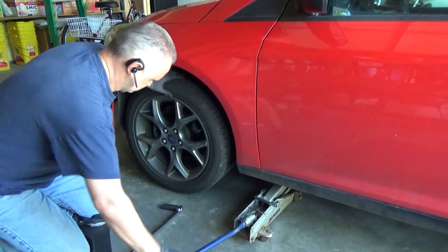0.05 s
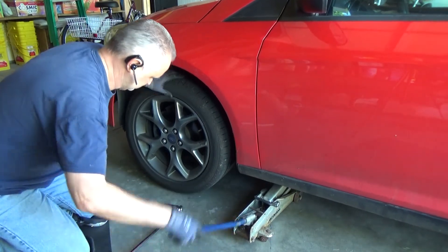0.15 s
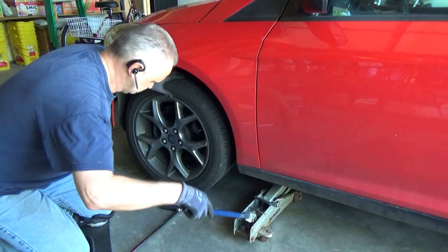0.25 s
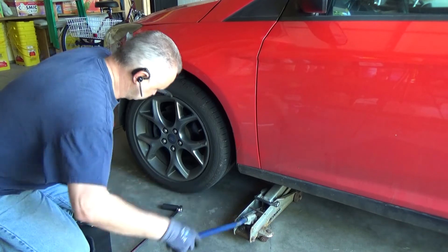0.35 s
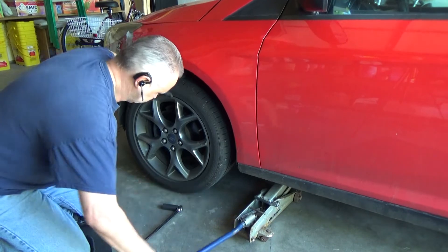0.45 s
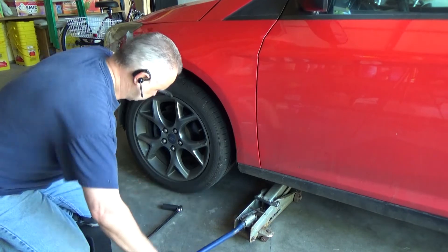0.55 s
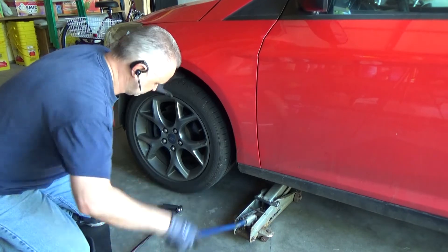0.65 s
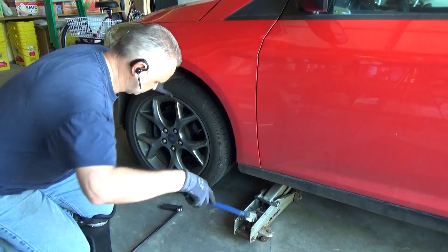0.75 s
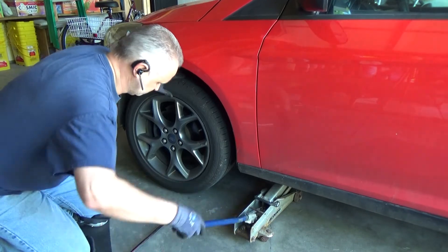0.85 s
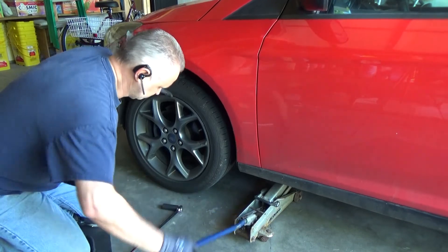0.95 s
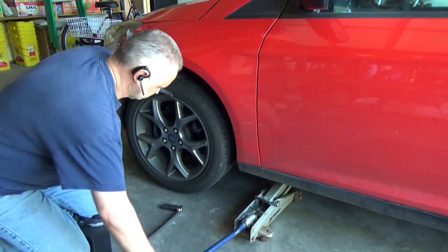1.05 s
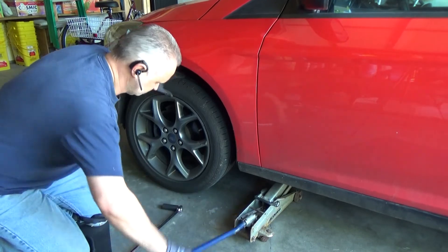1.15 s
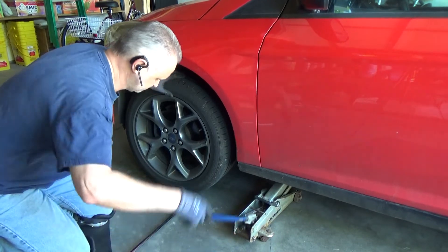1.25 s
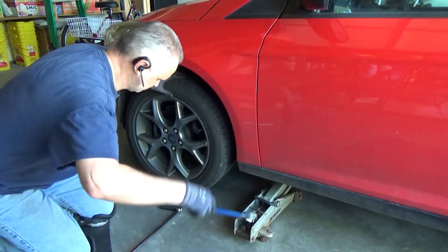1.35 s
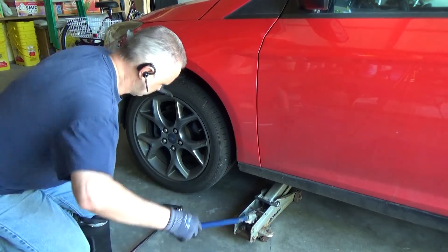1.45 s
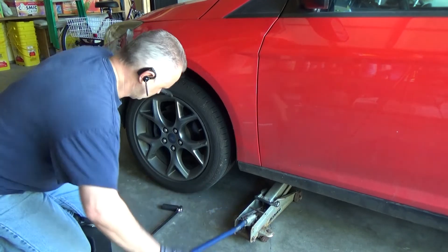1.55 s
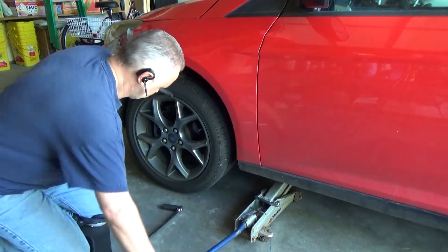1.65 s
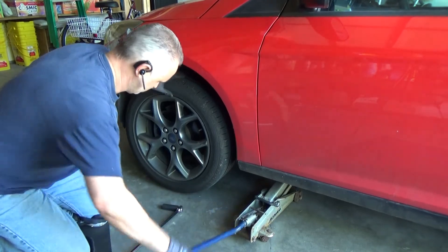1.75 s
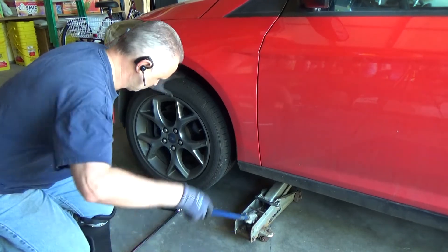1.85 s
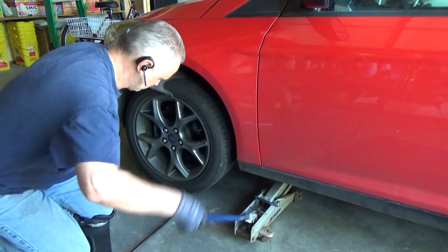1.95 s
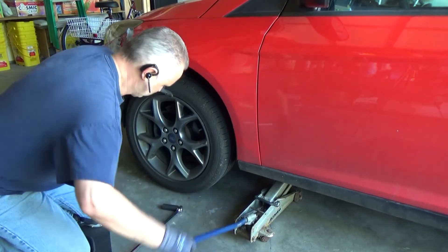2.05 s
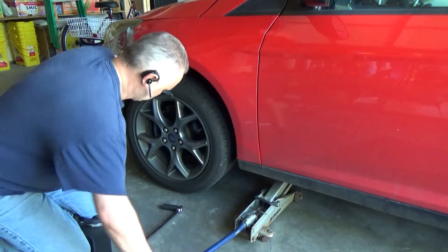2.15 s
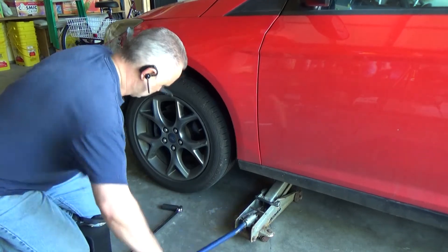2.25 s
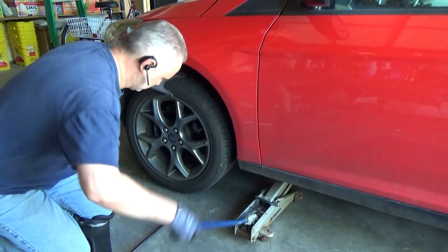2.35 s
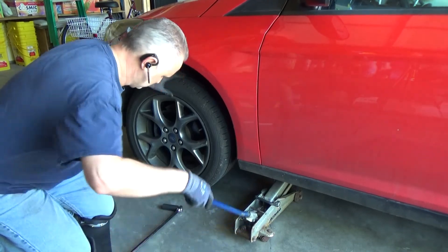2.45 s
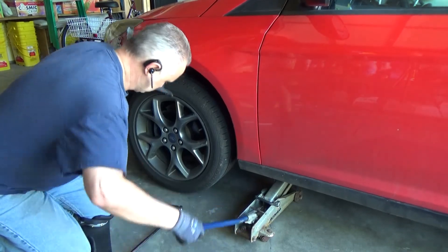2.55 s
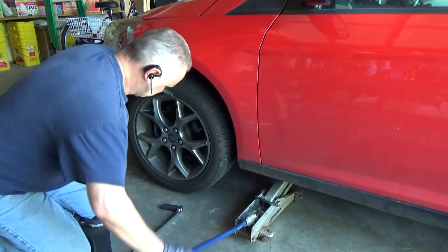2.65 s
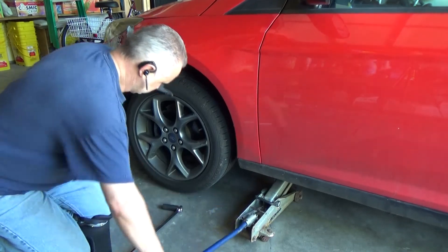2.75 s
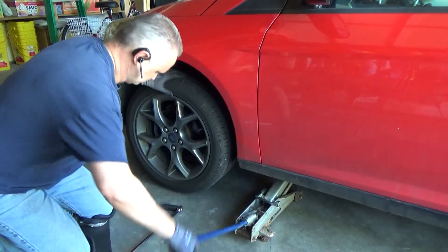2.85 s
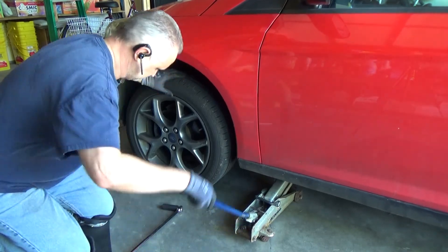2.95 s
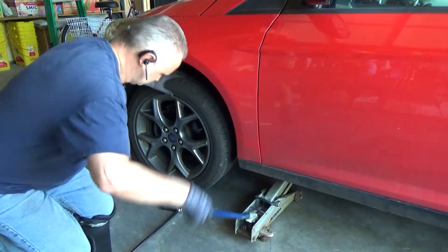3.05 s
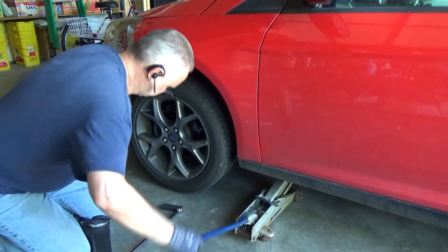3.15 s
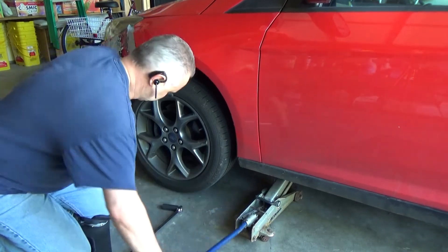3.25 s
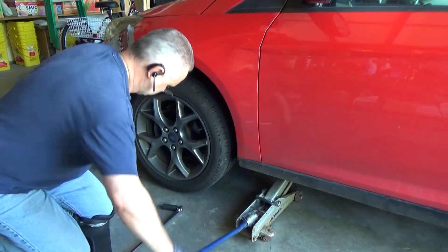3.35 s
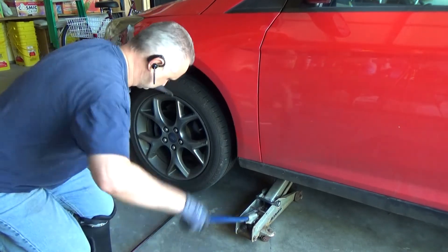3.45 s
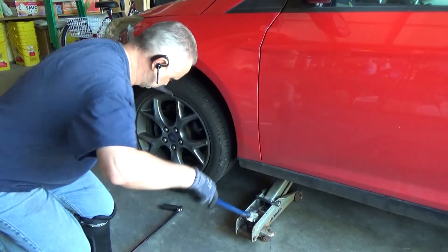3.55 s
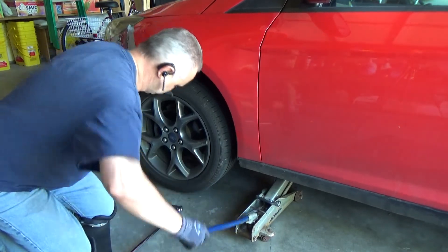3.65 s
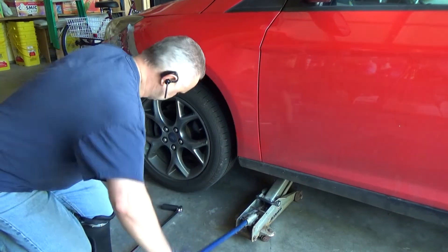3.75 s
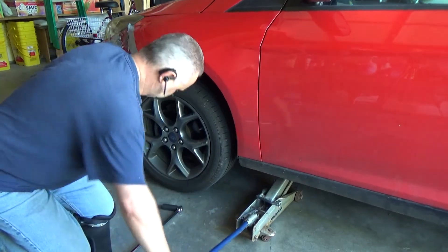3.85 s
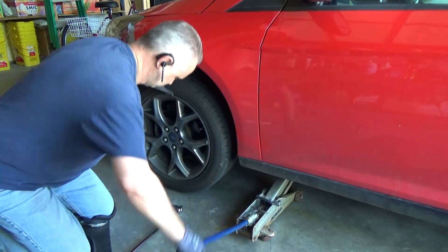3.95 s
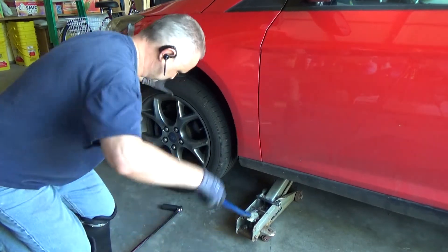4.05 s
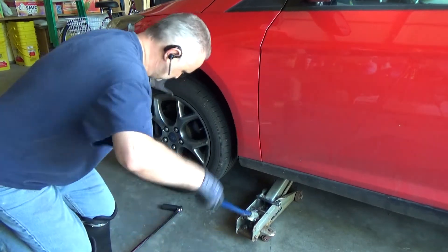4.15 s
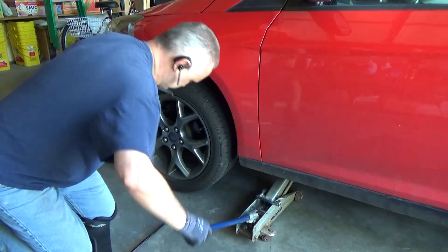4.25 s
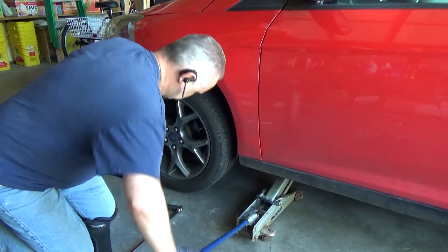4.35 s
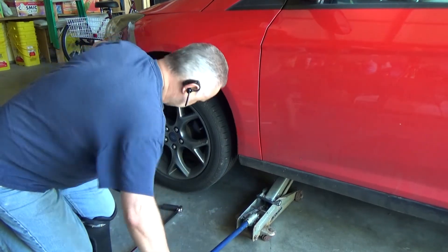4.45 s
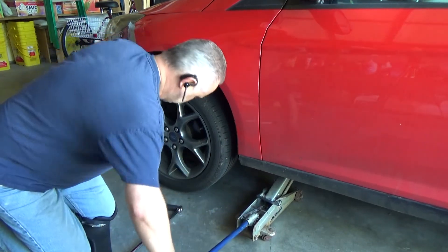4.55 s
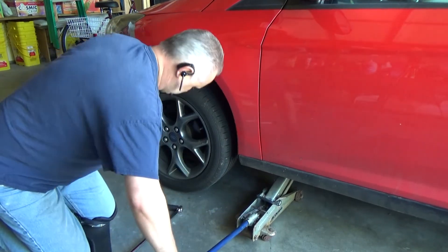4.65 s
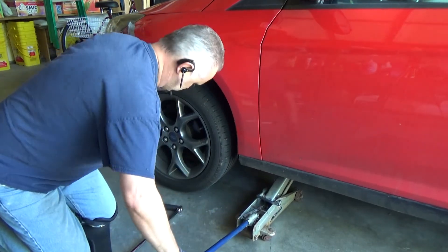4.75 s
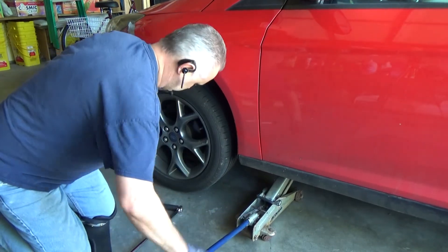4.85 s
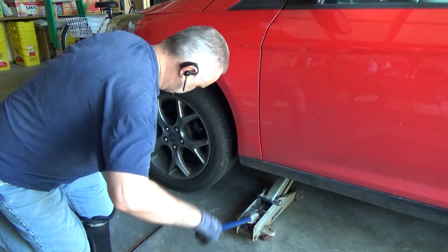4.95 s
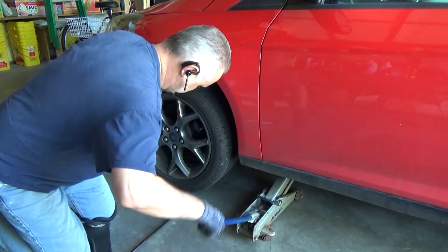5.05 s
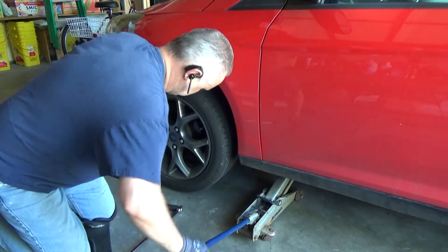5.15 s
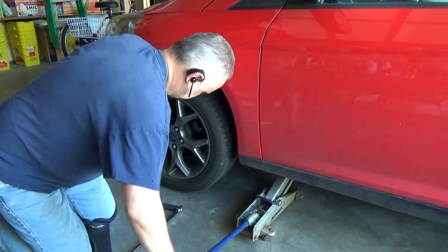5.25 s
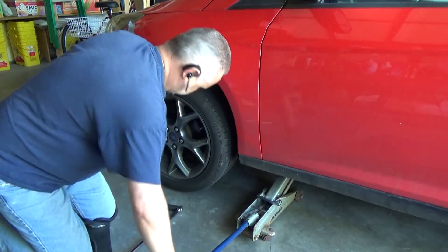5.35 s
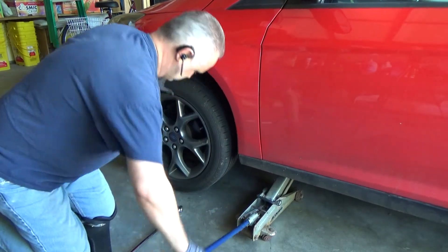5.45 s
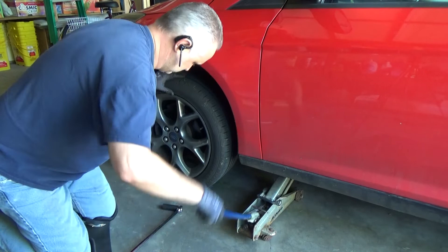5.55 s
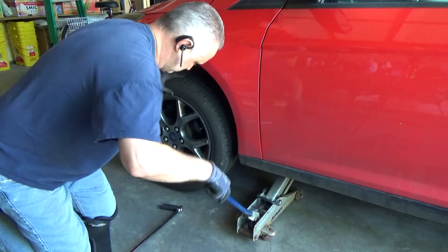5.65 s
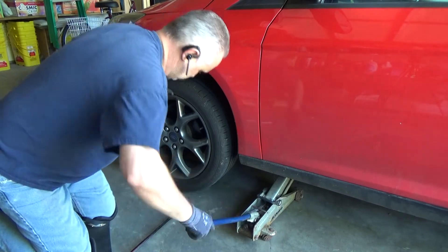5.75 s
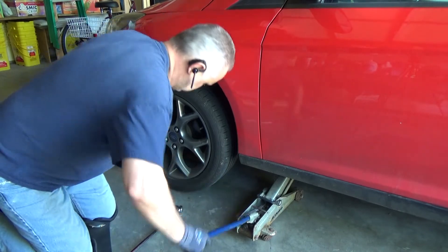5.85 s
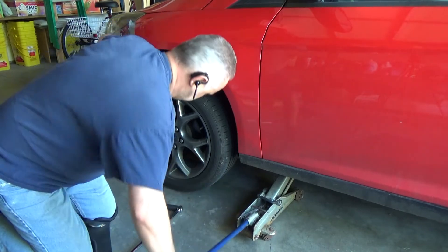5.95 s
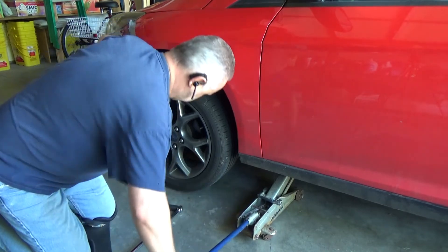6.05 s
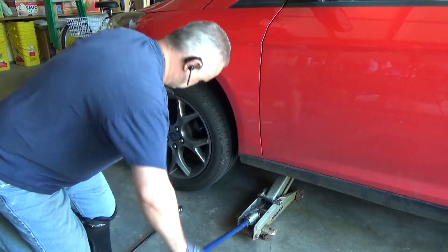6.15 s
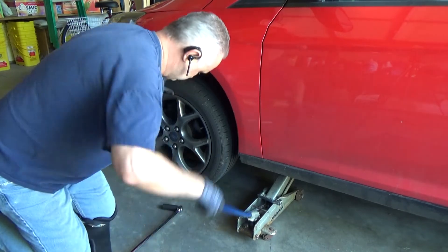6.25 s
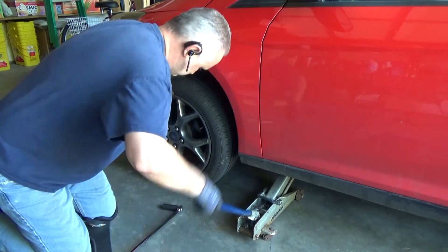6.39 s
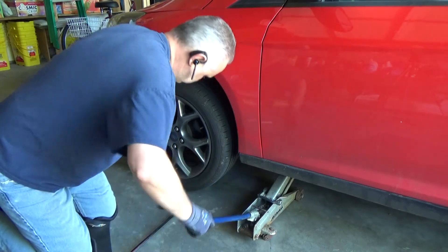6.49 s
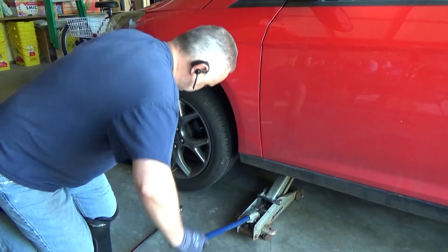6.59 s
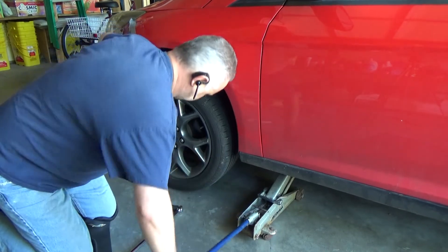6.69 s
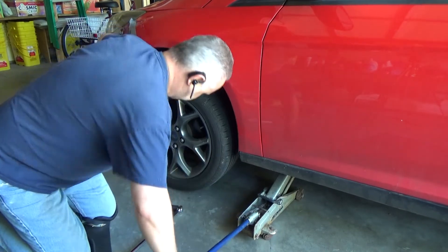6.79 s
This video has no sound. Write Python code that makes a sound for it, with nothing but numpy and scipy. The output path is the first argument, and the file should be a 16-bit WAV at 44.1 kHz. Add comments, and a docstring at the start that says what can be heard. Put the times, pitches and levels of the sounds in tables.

```python
"""A hydraulic floor jack is pumped by hand in a softly humming, hissing garage.
From the start its loose pins grind and rattle, and the unloaded lifting arm groans once. Then, about
twice a second, the steel handle clanks at the bottom of a stroke and the frame thuds as the stroke
turns. From about 4.5 s the car's weight is on the jack: the pumping slows and oil whistles through
the valve. A short echo follows every sound."""
import sys
import numpy as np
from scipy import signal
from scipy.io import wavfile
from scipy.ndimage import uniform_filter1d

SR = 44100
rng = np.random.default_rng(int(sys.argv[2]) if len(sys.argv) > 2 else 0)


def store_pcm(level_fs):
    """Save levels as 16-bit WAV."""
    pcm = np.round(np.clip(level_fs, -1, 1) * 32767).astype(np.int16)
    wavfile.write(sys.argv[1], SR, np.atleast_2d(pcm).T)


N = 300762

# Levels compare the rows of one table. A fade time is how long a sound takes to drop by 60 dB.
# loose pins knocking (time [s], level [dB], chink pitch [Hz], handle ring next to the knock [dB])
PIN_KNOCKS = [(0.074, -17.5, 4430, 3.5), (.089, -17, 8000, -2.5), (.150, -2.5, 7060, -8.5),
              (.261, -8, 5540, -2.5), (0.269, 0, 7700, -5), (0.317, -13, 7360, -1), (.338, -2.5, 6400, -5),
              (.591, -21, 4500, 8), (.671, -6, 4930, -8), (.680, -0.5, 10300, -26), (0.714, -12, 4410, 2.5),
              (.813, 2, 9140, -38), (0.832, 3.5, 6240, -8.5), (1.143, -19, 4540, 4.5),
              (1.169, -15.5, 4700, -1.5), (1.201, -14, 4580, -34), (1.235, -7.5, 4560, -2.5),
              (1.341, -17.5, 3200, 4), (1.370, -17.5, 4500, -9), (1.399, 2, 9640, -36),
              (1.415, -9, 8000, 2), (1.726, -19, 4670, 4.5), (1.780, -9, 8300, -16), (1.808, -6, 4560, -3),
              (1.898, -17.5, 9800, -5), (1.916, -7.5, 4680, 1.5), (1.994, -7, 7860, -5),
              (2.196, -14, 4970, -27), (2.268, -19.5, 4500, 4.5), (2.293, -16, 4700, 5.5),
              (2.322, -11, 8350, -10), (2.352, -24, 3730, -18), (2.421, -13.5, 3980, -38),
              (2.492, -2, 4740, -12), (2.513, -0.5, 8600, -41), (2.534, 3, 8960, -4.5),
              (2.809, -19, 4540, 6.5), (2.829, -6.5, 8000, -43), (2.868, -16, 4530, -26),
              (2.931, -27, 7100, -13), (2.980, -12.5, 4700, -31), (3.023, -10, 4200, -30),
              (3.033, 8.5, 8140, -48), (3.054, -20.5, 7970, 10), (3.079, -12.5, 4630, 5),
              (3.107, -3.5, 4400, -27), (3.288, -5.5, 4930, -12), (3.359, -22, 4200, 6),
              (3.379, -5.5, 4270, -11), (3.424, -16.5, 4460, -1.5), (3.504, -20.5, 5200, -5),
              (3.54, -22, 9800, -27), (3.581, -6.5, 4960, -12), (3.640, -13, 7900, -8),
              (3.646, 4.5, 6900, -12.5), (3.907, -20, 4400, 4.5), (3.928, -6, 4220, -9.5),
              (3.953, -1.5, 6720, -7.5), (3.989, -5.5, 8800, -17), (4.109, -14, 4860, -3.5),
              (4.159, -4.5, 4400, 2.5), (4.196, -9.5, 6600, -3), (4.208, -8.5, 8750, -2),
              (4.228, 4, 7330, -1), (4.453, -19.5, 4900, -5), (4.881, -26.5, 3540, -3),
              (4.908, -16, 8000, -17), (4.914, -14.5, 3680, -3.5), (4.921, -8, 3700, -9.5),
              (5.119, -27, 3000, -5), (5.127, -10.5, 8800, -40), (5.155, -3, 4960, -2.5),
              (5.418, -26, 4300, 6.5), (5.467, -19.5, 4800, 1.5), (5.475, -16.5, 4460, -25),
              (5.518, -13, 8000, -17), (5.525, -8, 7500, -34), (5.557, -18.5, 4560, 3),
              (5.608, -18.5, 9400, 4), (5.622, -20, 9150, -4), (5.732, -9, 4900, -4.5),
              (5.744, -6, 5900, -31), (5.762, 0, 8360, -5.5), (6.103, -29, 3670, 8),
              (6.209, -15.5, 4900, -18), (6.223, -6.5, 8640, -13.5), (6.311, -14, 4730, -3),
              (6.340, -13.5, 4740, 2.5), (6.376, -4, 4790, -2), (6.423, 0, 6700, -7),
              (6.445, -4.5, 8200, -0.5)]
# the handle hitting its bottom stop (time [s], level [dB], fade time of the bouncing [s])
HANDLE_HITS = [(0.3447, -9, 0.18), (0.8708, -9.5, 0.21), (1.4298, -11, 0.15), (2.0056, -3.5, 0.1),
               (2.5446, -5, 0.13), (3.1087, -3, 0.18), (3.6532, -9, 0.23), (4.2397, -4, 0.14),
               (5.1662, -8.5, 0.22), (5.7778, -6.5, 0.24), (6.4625, -10, 0.2)]
# the frame jolted as the stroke turns (time [s], level [dB], fade time of the shudder [s])
FRAME_JOLTS = [(0.502, -24.5, 0.89), (1.069, -23.5, 0.16), (1.655, -26, 0.54), (2.187, -23, 0.19),
               (2.744, -25.5, 0.16), (3.289, -23.5, 0.42), (3.837, -28, 0.58), (4.441, -24, 0.14),
               (5.328, -31, 1), (6.016, -29.5, 0.66), (6.746, -31.5, 0.62)]
# oil squeezing through the valve (start [s], length [s], first pitch [Hz], last pitch [Hz], level [dB])
OIL_WHISTLES = [(4.458, .12, 6200, 5700, -51), (4.498, 0.23, 4770, 4130, -42),
                (4.476, 0.29, 3930, 3600, -46.5), (5.034, 0.073, 7780, 7950, -61),
                (5.3, 0.13, 2850, 3330, -43), (5.949, 0.11, 2640, 2750, -43.5),
                (6.167, 0.076, 4700, 4780, -40.5), (6.262, 0.061, 3840, 3750, -39),
                (6.62, 0.12, 3780, 3820, -60), (6.622, 0.12, 2760, 2400, -48.5)]
# the arm's one groan (start [s], length [s], pitch [Hz], resonance width [Hz], level [dB])
ARM_GROAN = (.282, .05, 720, 350, -31)
# pins and rollers grinding under the moving handle (time [s], level [dB])
GRIND_LEVELS = [(0.0, -41.5), (0.66, -39.5), (0.82, -29.5), (0.97, -35), (1.21, -49), (1.35, -34.5),
                (1.77, -40), (1.92, -40.5), (2.45, -34), (2.87, -40.5), (3.19, -33.5), (3.601, -39.5),
                (4.58, -41), (4.71, -48), (5.05, -61), (5.36, -43), (6.19, -40.5), (6.4, -32), (6.82, -51)]

# the notes a struck pin rings with (pitch [Hz], level [dB], fade time [s])
PIN_NOTES = [(2974, -4, 0.025), (3760, -6.5, 0.012), (4748, -0.5, .02), (5420, -4.5, 0.019),
             (7140, -0.5, 0.016), (8540, 2, 0.015), (10180, -2.5, 0.0096), (12260, -9, 0.0083)]
# the notes of the steel handle tube and arm (pitch [Hz])
HANDLE_PITCHES = [684, 913, 997, 1048, 1364, 1705, 1800, 1852, 2093, 2275, 2395, 2470, 2830, 2999]
# how each of those notes rings (level [dB], fade time [s])
HANDLE_RINGS = [(-6, 0.12), (3, 0.13), (10.5, 0.009), (-2, 0.21), (-1.5, 0.052), (6, 0.029), (7.5, 0.039),
                (7.5, 0.058), (13.5, 0.0096), (2.5, 0.064), (6.5, 0.13), (-15, 0.038), (-2, 0.043),
                (0, 0.0093)]
# the low notes of the frame (pitch [Hz], level [dB], fade time [s])
FRAME_NOTES = [(159.3, 5, 0.038), (184, 0.5, 0.083), (292, -48, 0.054), (392, -15, 0.048),
               (423, 6.5, 0.038), (480, 6, 0.02), (606.7, -6.5, 0.13)]

# the bright tone of a knock (frequency [Hz], level [dB])
KNOCK_TONE = [(300, -38), (1100, -7), (2250, 2), (3000, 1), (4800, 0.5), (5800, -1), (6850, 0),
              (9000, -0.5), (10600, -7), (12500, -14.5), (15000, -30), (16500, -32)]
# the arm's many crowded notes, heard as one wash (frequency [Hz], level [dB])
ARM_TONE = [(100, -30.5), (170, -14.5), (400, -12.5), (750, -11.5), (1000, -6), (1350, -8), (1750, -5.5),
            (2300, -6.5), (2700, -7.5), (3250, -3.5), (4000, -19), (7200, -22.5), (14000, -65.5)]
# the tone of grinding steel (frequency [Hz], level [dB])
GRIND_TONE = [(150, -6), (500, -9.5), (1000, -0.5), (2400, 1), (3600, -3), (8500, -8), (15000, -27)]
# how long the garage echoes (frequency [Hz], fade time [s])
ECHO_FADES = [(150, 0.3), (400, 0.57), (1000, 0.28), (2800, 0.29), (7000, 0.23), (13000, 0.15)]
# the tone of the garage's steady hush (frequency [Hz], level [dB])
HUSH_TONE = [(18, -39), (30, 7), (194, -9.5), (569, -2), (937, 0), (1500, -8), (3980, -3), (7090, -6),
             (7670, -3.5), (8300, -0.5), (16000, -31)]
# the microphone's bass cut (frequency [Hz], gain [dB])
BASS_CUT = [(20, -72), (100, -39), (160, 2.5), (20000, -1.5)]

CHATTER_FADE_S, SETTLE_FADE_S = 0.034, 0.13  # a knock's quick chatter, then its gritty settling
TILT_DB_PER_OCTAVE, TILT_PER_DB = 12, 0.88  # harder clanks favour the high notes more
LIMIT_DB, RECOVERY_DB_PER_S, TREBLE_EDGE_HZ = -11, 440, 16200


def linkage_rattle():
    """Loose pins ping and chatter in their holes; each knock also rings the handle, arm and frame."""
    chinks, rings, arm, frame, pings = np.zeros((5, N))
    handle, pin = handle_notes(), notes(PIN_NOTES)[:, :SR // 20]
    n = SR // 10
    for start, db, hz, ring_db in PIN_KNOCKS:
        contacts = chatter(CHATTER_FADE_S)[:n]
        settling = chatter(SETTLE_FADE_S, blow=0, spread_db=4.5, rise_s=0.0048)[:n]
        contacts += amp(-19) * settling * np.linspace(1, 0, n)
        push = amp(db) * contacts
        add(pings, start, amp(db + 5) * ring(pin, 4 * rng.standard_normal(len(pin))))
        chink = 0.65 * resonate(push, hz, width_hz=1500) + 1.7 * resonate(push, hz, width_hz=224)
        add(chinks, start, 1.05 * push + chink)
        spot_db = 5 * rng.standard_normal(len(handle))  # the spot that is struck favours some notes
        add(rings, start, amp(db + ring_db + 5) * ring(handle, spot_db))
        add(arm, start, amp(ring_db + 20) * push)
        add(frame, start, amp(0.45 * db - 19.5) * contacts)
    filter_gain = np.linalg.norm(colour(signal.unit_impulse(2048), KNOCK_TONE))
    bright = amp(4) * colour(chinks, KNOCK_TONE) / filter_gain
    thumps = signal.oaconvolve(frame, ring(notes(FRAME_NOTES)))[:N]
    return pings + bright + rings + colour(arm, ARM_TONE) + thumps


def handle_clanks():
    """The steel tube hits its stop and rings; it bounces there, which sets the arm ringing too."""
    out, handle = np.zeros(N), handle_notes()
    octaves = np.log2(np.array(HANDLE_PITCHES) / 2000)
    for start, db, fade_s in HANDLE_HITS:
        spot_db = 1.5 * rng.standard_normal(len(handle))  # nearly the same spot is struck each time
        tilt_db = (TILT_DB_PER_OCTAVE + TILT_PER_DB * db) * octaves
        bounces = chatter(fade_s, blow=0.67, spread_db=2.5)
        blows = signal.unit_impulse(len(bounces)) + amp(-15) * bounces / np.linalg.norm(bounces)
        add(out, start, amp(db + 20.5) * signal.oaconvolve(blows, ring(handle, spot_db + tilt_db)))
        arm_shake = chatter(fade_s, blow=0.79, spread_db=-2, rise_s=0.0011)
        add(out, start, amp(db + 19) * colour(arm_shake, ARM_TONE))
    return out


def frame_thuds():
    """A dry tick as the slack is taken up; then the frame is jolted twice, rocks and shudders."""
    shakes, ticks, jolts = np.zeros((3, N))
    frame = notes(FRAME_NOTES)
    # the jolt enters near the pump's pivot, which favours the middle notes
    middle_db = -7 * abs(np.log2(np.transpose(FRAME_NOTES)[0] / 420))
    for start, db, fade_s in FRAME_JOLTS:
        add(shakes, start, amp(db) * chatter(fade_s, blow=1.16, spread_db=2, rise_s=0.00081))
        add(ticks, start - 0.003, amp(db) * chatter(0.054, blow=1.2, rise_s=0.00052))
        add(jolts, start, amp(db - 2) * ring(frame[:2]))  # rocking on the two lowest notes
        for delay_s, jolt_db in [(0, 14.2), (0.03, 11.5)]:
            add(jolts, start + delay_s, amp(db + jolt_db) * ring(frame, middle_db))
    shudder = signal.oaconvolve(shakes, ring(frame, middle_db))[:N]
    return shudder + jolts + amp(23.5) * resonate(ticks, 1220, width_hz=530)


def valve_whistles():
    """Oil swirls through the valve with a sliding, breathy whistle; the flow stutters and weakens."""
    out = np.zeros(N)
    for start, length_s, first_hz, last_hz, db in OIL_WHISTLES:
        n = round(length_s * SR)
        progress = np.linspace(0, 1, n)
        hz = first_hz + (last_hz - first_hz) * progress
        stutter = amp(4 * wobble(n, 300))
        width_hz = np.clip(0.47 * length_s * first_hz, 260, 600)  # long whistles are breathier
        whistle = unit_level(pitched_noise(n, hz, width_hz) * stutter)
        add(out, start, amp(db - 4 * progress ** 3) * whistle * signal.windows.tukey(n, 0.2))
    return out


def arm_groan():
    """The unloaded arm slips once, with a short, rough, hollow sound."""
    start, length_s, hz, width_hz, db = ARM_GROAN
    out, n = np.zeros(N), round(length_s * SR)
    add(out, start, amp(db) * unit_level(pitched_noise(n, hz, width_hz)) * signal.windows.tukey(n, 0.4))
    return out


def roller_grind(slips_per_s=3000):
    """Pins and rollers make many tiny slips, and a few large ones, in uneven clumps."""
    times, levels_db = np.transpose(GRIND_LEVELS)
    sizes = amp(4.1 * np.minimum(rng.exponential(1, N), 3.2))
    slips = sizes * (rng.random(N) < slips_per_s / SR) * rng.choice([-1., 1.], N)
    clumps_db = 3.1 * wobble(N, 900)
    level_db = np.interp(np.arange(N) / SR, times, levels_db) - 6 + clumps_db
    return amp(level_db) * unit_level(colour(slips, GRIND_TONE))


def garage_echo(x):
    """The garage's short echo, blended steadily between three patterns so no single pitch rings out."""
    turn = np.pi * 3.7 * np.arange(N) / SR
    shares = [np.sqrt(2 / 3) * np.cos(turn + np.pi * k / 3) for k in range(3)]
    return sum(signal.oaconvolve((share * x)[None], echo_pattern(), axes=1)[:, :N] for share in shares)


def echo_pattern():
    """Scattered reflections, left and right; each frequency dies away at its own speed."""
    reflections = np.zeros((2, SR // 2))
    arrivals = np.arange(200, SR // 2 - 20, 20) + rng.integers(0, 20, (2, (SR // 2 - 201) // 20))
    np.put_along_axis(reflections, arrivals, rng.choice([-1., 1.], arrivals.shape), 1)
    hz, t, bands = signal.stft(reflections, SR, nperseg=256)
    bands *= amp(-60 * t / look_up(ECHO_FADES, hz)[:, None])
    # left and right differ mostly in the middle range
    bands[1] *= 0.47 * np.exp(-(np.log((hz + 1) / 2400) / 1.77) ** 2)[:, None]
    shared, side = signal.istft(bands, SR, nperseg=256)[1]
    return np.array([shared + side, shared - side]) / np.linalg.norm(shared)


def garage_hush():
    """Steady, quiet background noise, mostly alike on the left and right."""
    shared, side = rng.standard_normal((2, N))
    noise = np.array([shared + 0.48 * side, shared - 0.11 * side])
    return amp(-48.5) * unit_level(colour(noise, HUSH_TONE))


def chatter(fade_s, blow=0.47, spread_db=3, rise_s=0.0021):
    """Steel meets steel: a first blow, then a dying run of tiny, uneven contacts."""
    t = np.arange(SR // 4) / SR
    noise = rng.standard_normal(len(t))
    sizes = np.minimum(rng.exponential(1, len(t) // 48 + 1), 3)  # a new size about every millisecond
    first_blow = (1 + blow * np.exp(-t / 0.0014)) / (1 + blow)
    shape = amp(-60 * t / fade_s) * first_blow * (1 - np.exp(-t / rise_s))
    contacts = shape * noise * amp(spread_db * np.repeat(sizes, 48)[:len(t)])
    return contacts * np.linalg.norm(shape) / np.linalg.norm(contacts) / 3  # the shape sets the energy


def notes(table):
    """One fading sine wave a row; neighbours swing opposite ways, and the contact takes a moment."""
    t = np.arange(SR // 5) / SR
    sines = [(-1) ** k * amp(db - 60 * t / max(fade_s, 0.01)) * np.sin(2 * np.pi * hz * t)
             for k, (hz, db, fade_s) in enumerate(table)]
    return np.array(sines) * (1 - np.exp(-t / 0.00011))


def handle_notes():
    """The fading notes of the handle."""
    return notes([(hz, *row) for hz, row in zip(HANDLE_PITCHES, HANDLE_RINGS)])


def ring(waves, levels_db=0):
    """A part's ring after one tap: its notes mixed together and scaled to energy 1."""
    out = (amp(levels_db) * np.ones(len(waves))) @ waves
    return out / np.linalg.norm(out)


def resonate(x, hz, width_hz):
    """Keeps the sound near one pitch, which may slide: shift it down to 0 Hz, smooth, shift back."""
    turn = np.exp(2j * np.pi * np.cumsum(hz * np.ones(len(x))) / SR)
    memory = np.exp(-np.pi * width_hz / SR)
    return 2 * (turn * signal.lfilter([1 - memory], [1, -memory], x / turn + 1e-18)).real


def pitched_noise(n, hz, width_hz):
    """Noise sent twice through a resonance, so that it takes on a pitch."""
    return resonate(resonate(rng.standard_normal(n), hz, width_hz), hz, width_hz)


def colour(x, tone):
    """Filters a sound by a (frequency, level) table, with no ringing ahead of a blow."""
    hz = abs(np.fft.fftfreq(4096, 1 / SR))
    log_gain = np.log(amp(look_up(tone, hz)))
    taps = np.fft.ifft(np.exp(np.conj(signal.hilbert(log_gain)))).real[:2048]
    return signal.oaconvolve(x, taps if x.ndim == 1 else taps[None])[..., :x.shape[-1]]


def look_up(table, hz):
    """Reads between the rows of a (frequency, value) table, with octaves evenly spaced."""
    table_hz, values = np.transpose(table)
    return np.interp(np.log(hz + 1), np.log(table_hz + 1), values)


def wobble(n, smooth_samples):
    """A smoothed random wander of typical size 1."""
    return unit_level(uniform_filter1d(rng.standard_normal(n), smooth_samples))


def unit_level(x):
    """Scales a sound to an average (rms) level of 1."""
    return x / np.sqrt(np.mean(x ** 2) + 1e-20)


def amp(db):
    """Turns decibels into a multiplier."""
    return 10 ** (np.asarray(db) / 20)


def add(mix, start, sound):
    """Mixes a sound in at a start time in seconds."""
    part = mix[round(start * SR):][:len(sound)]
    part += sound[:len(part)]


def scene():
    """The jack, its echo and the hush, in stereo."""
    jack = linkage_rattle() + handle_clanks() + frame_thuds()
    jack += valve_whistles() + arm_groan() + roller_grind()
    return amp(2.5) * jack[None] + amp(-3) * garage_echo(jack) + garage_hush()


def record(dry):
    """Turns the loudest blows down, cuts the bass, clips, adds a faint rumble and trims the treble."""
    power_db = 10 * np.log10(abs(uniform_filter1d((dry ** 2).mean(0), 60)) + 1e-12)
    recovery_db = np.arange(N) * RECOVERY_DB_PER_S / SR
    held_db = np.maximum.accumulate(power_db + recovery_db) - recovery_db  # jumps up, then sinks back
    over_db = np.maximum(held_db - LIMIT_DB, 0)
    limited = dry / amp(0.9 * uniform_filter1d(over_db, 60))
    clipped = np.clip(colour(limited, BASS_CUT), -0.93, 0.93)
    noise = rng.standard_normal(N) + 0.18 * rng.standard_normal((2, N))
    rumble = amp(-64) * unit_level(np.array([resonate(side, 128, width_hz=150) for side in noise]))
    treble_cut = signal.firwin(511, TREBLE_EDGE_HZ, window=("kaiser", 9), fs=SR)
    return signal.oaconvolve(clipped + rumble, treble_cut[None], "same")


dry = scene()
out = record(dry)
store_pcm(out)
```